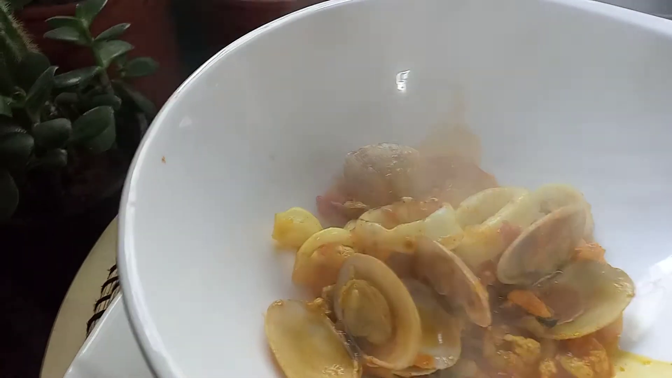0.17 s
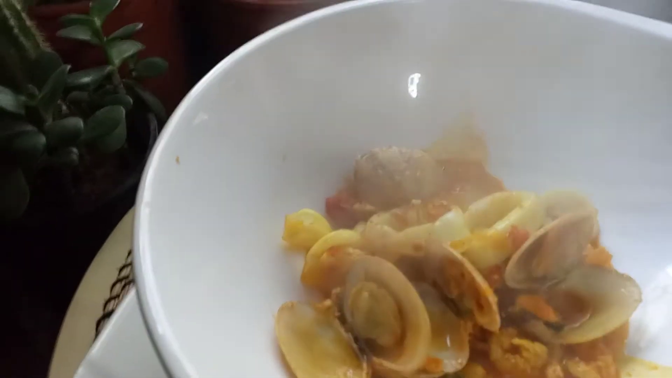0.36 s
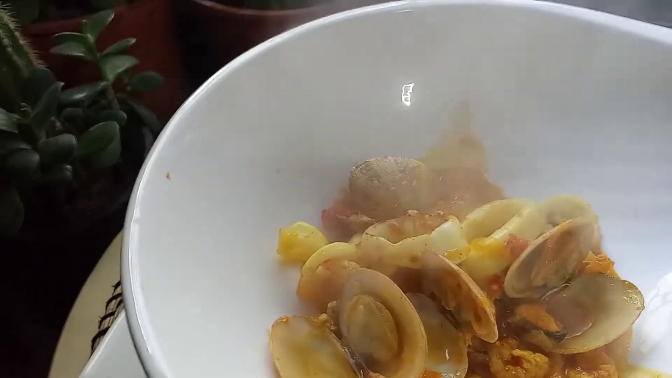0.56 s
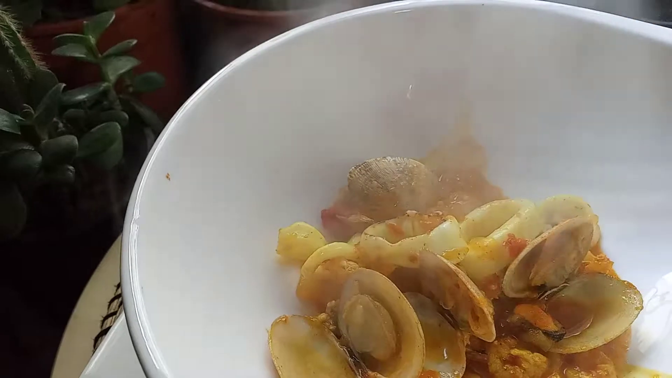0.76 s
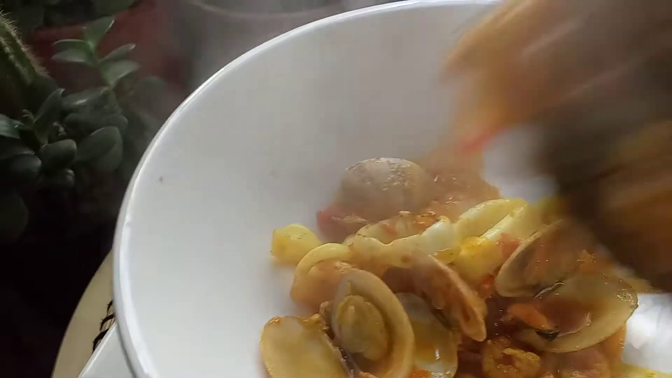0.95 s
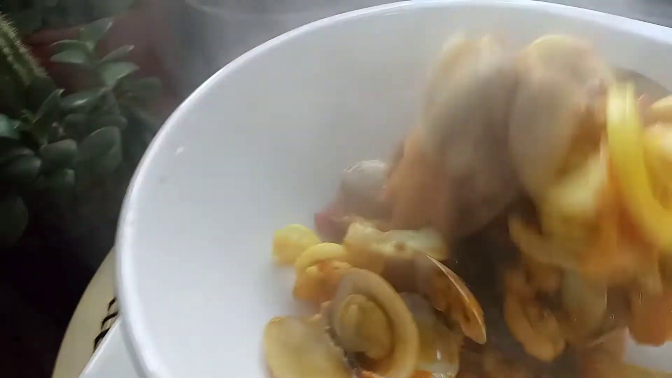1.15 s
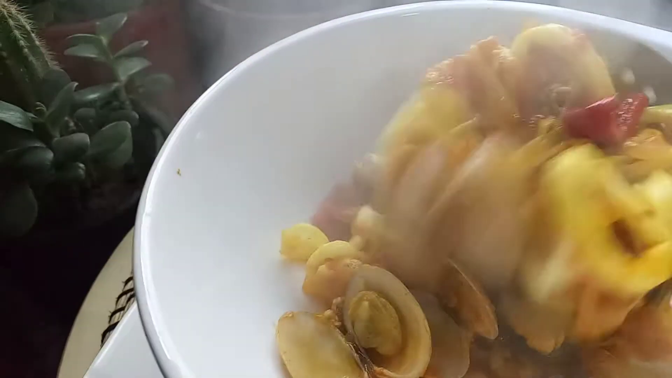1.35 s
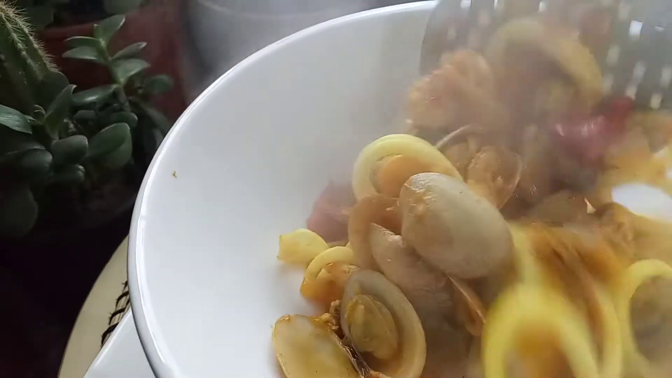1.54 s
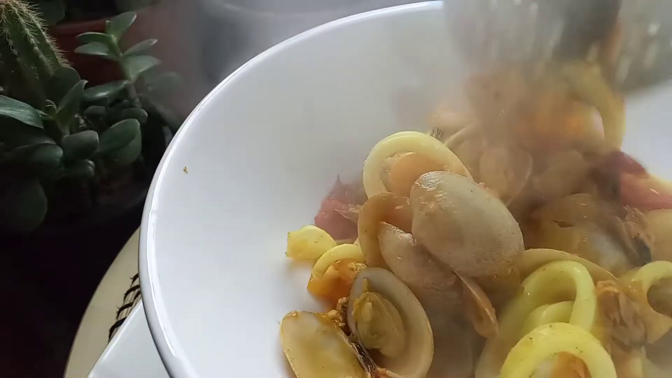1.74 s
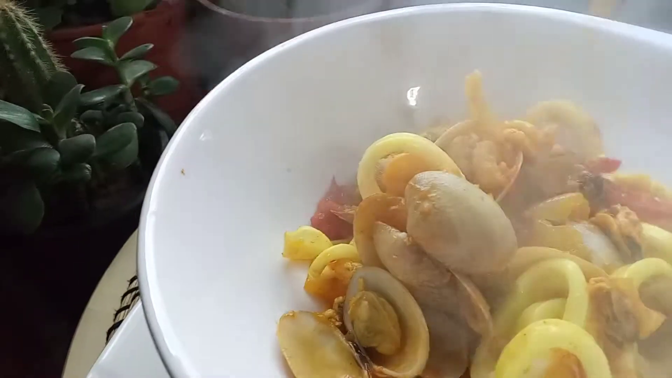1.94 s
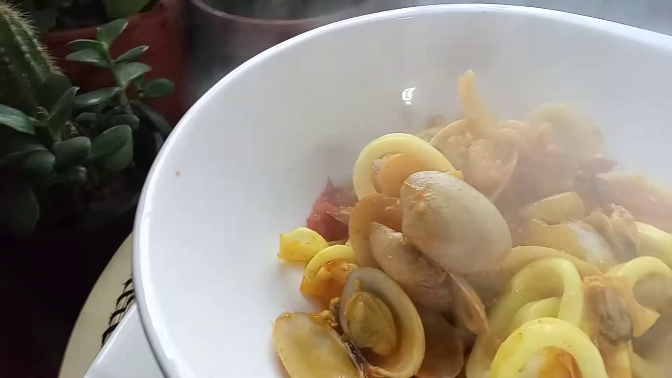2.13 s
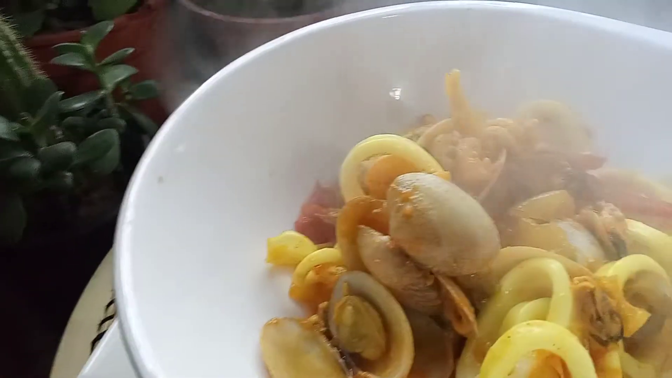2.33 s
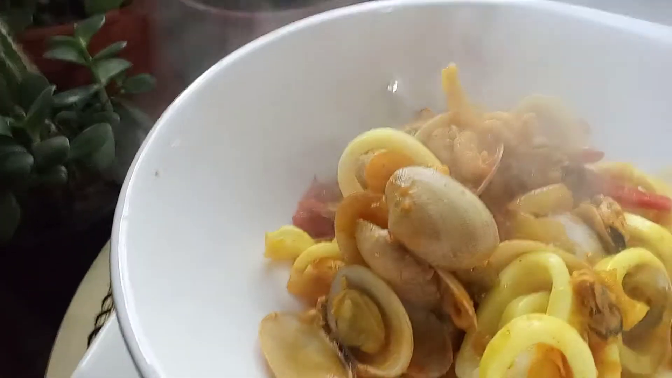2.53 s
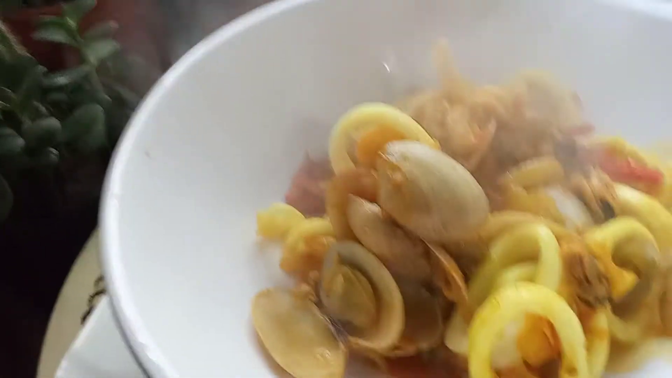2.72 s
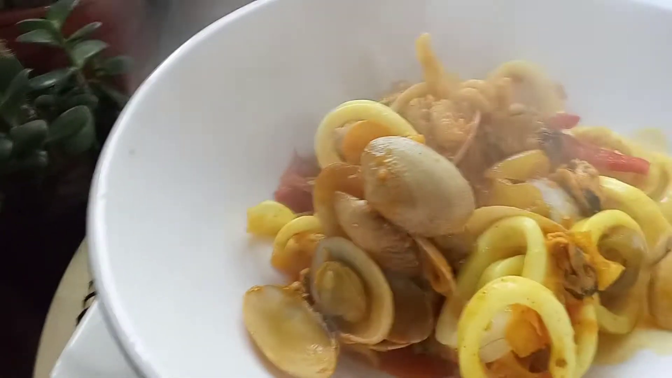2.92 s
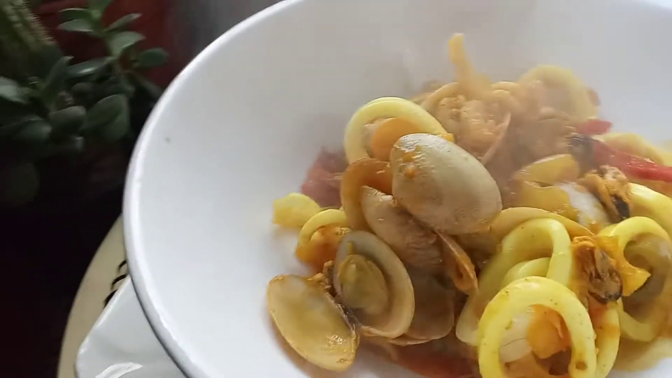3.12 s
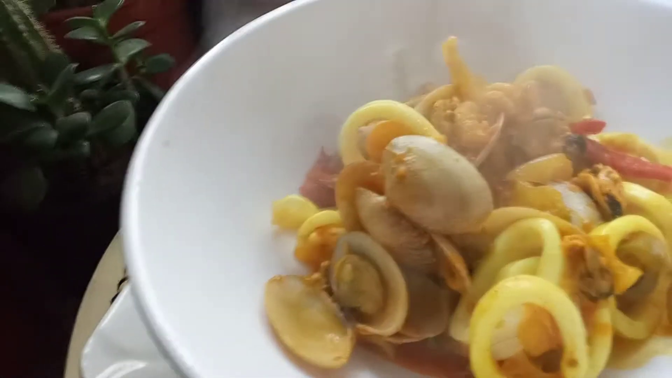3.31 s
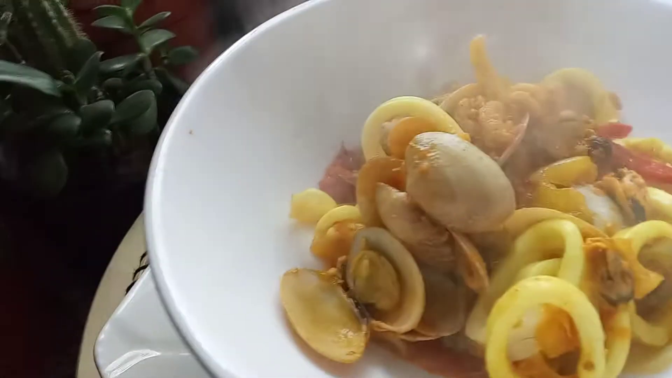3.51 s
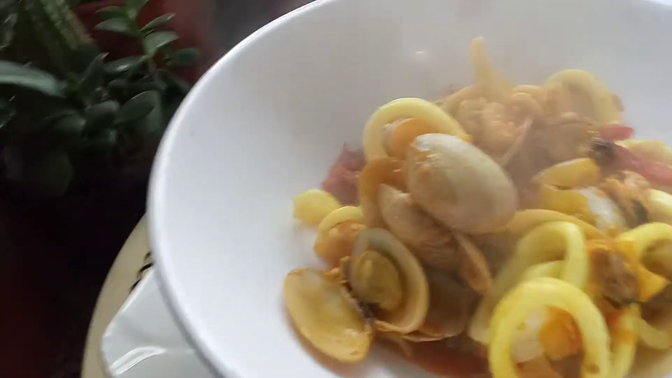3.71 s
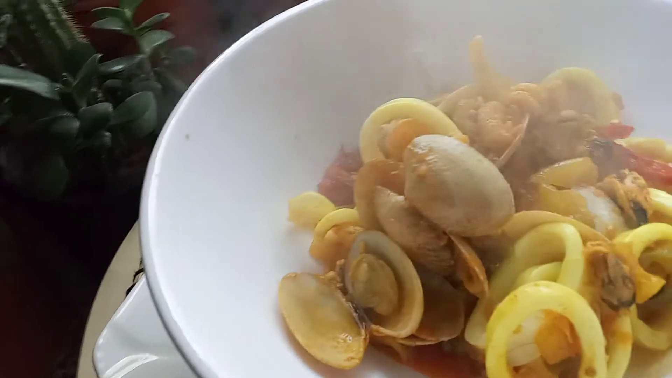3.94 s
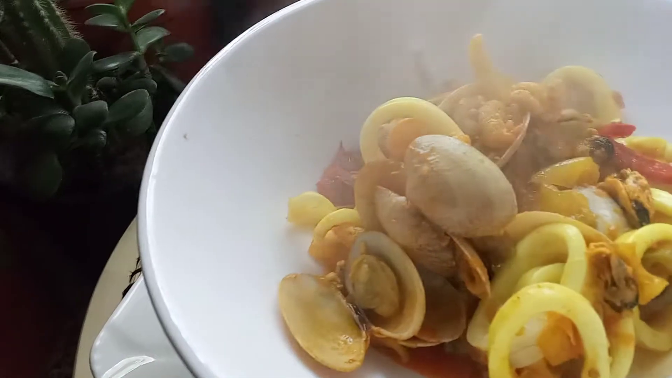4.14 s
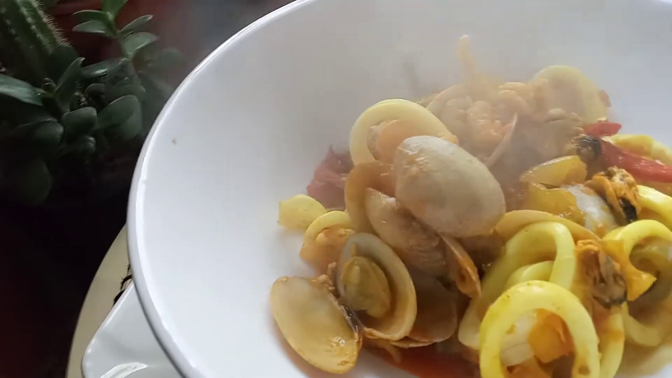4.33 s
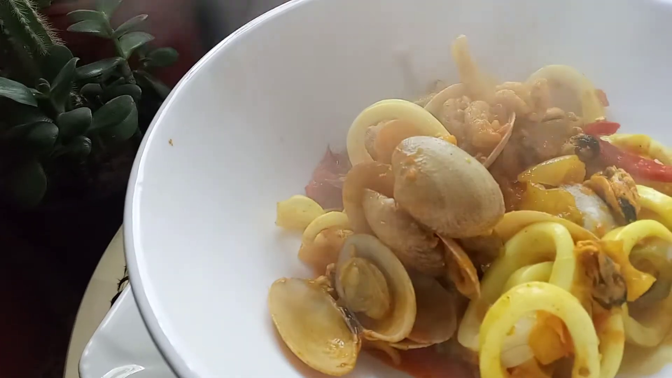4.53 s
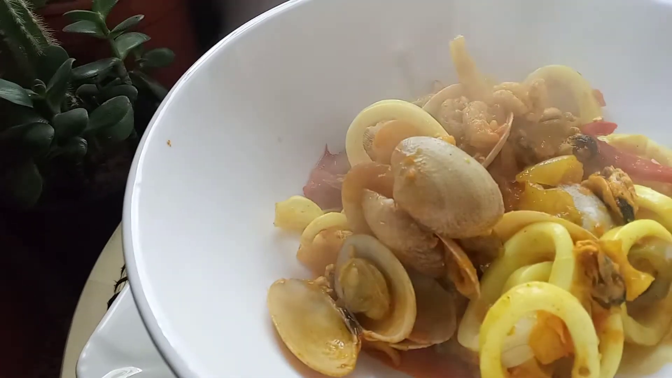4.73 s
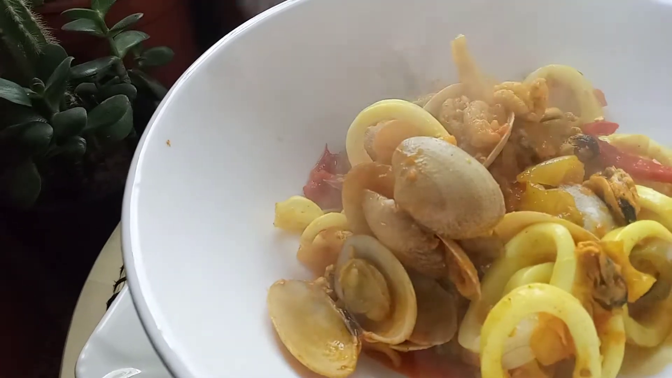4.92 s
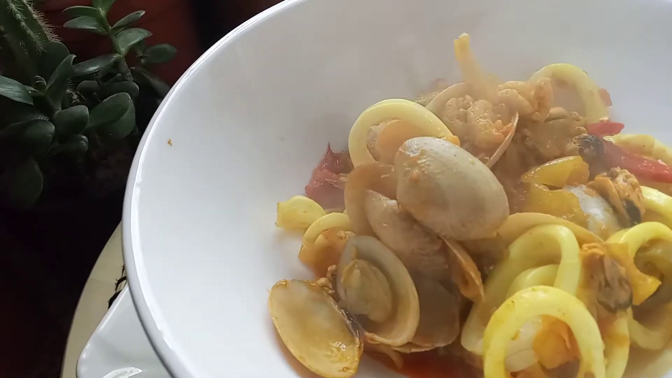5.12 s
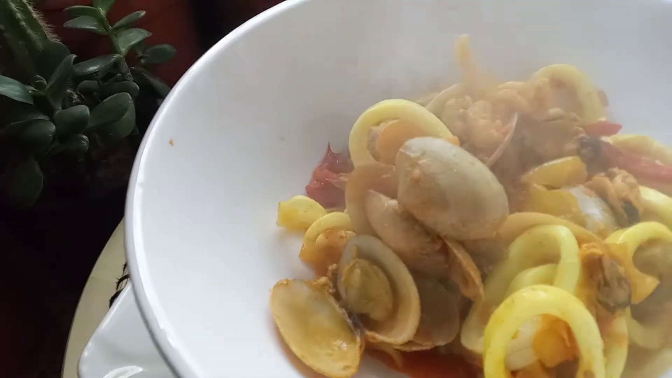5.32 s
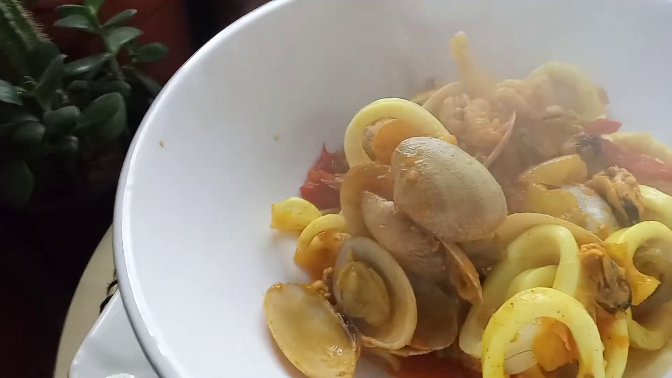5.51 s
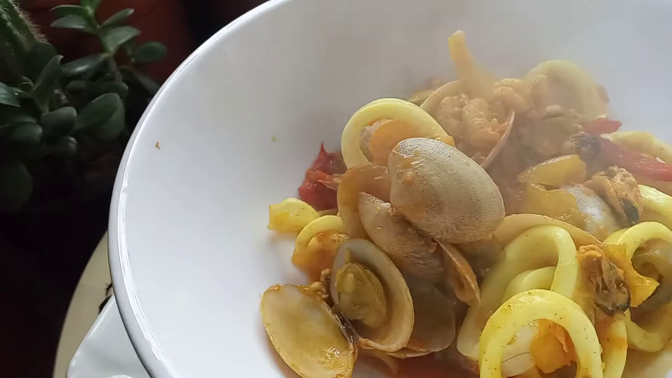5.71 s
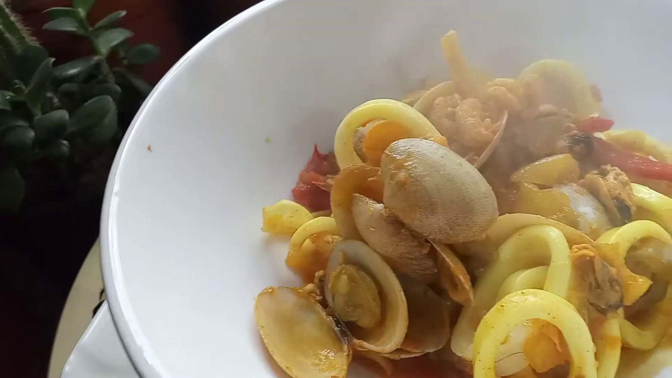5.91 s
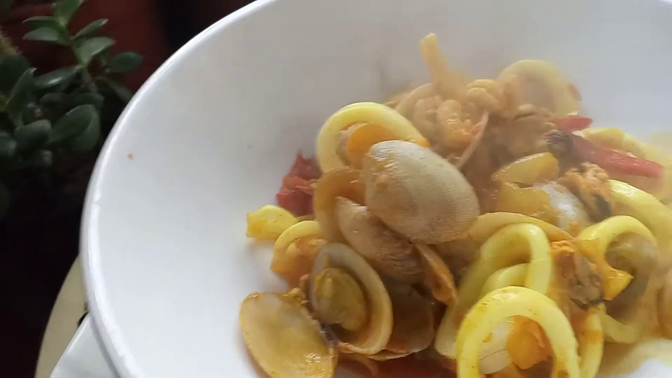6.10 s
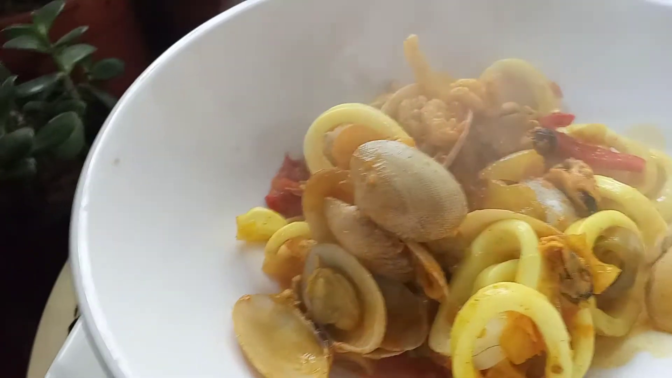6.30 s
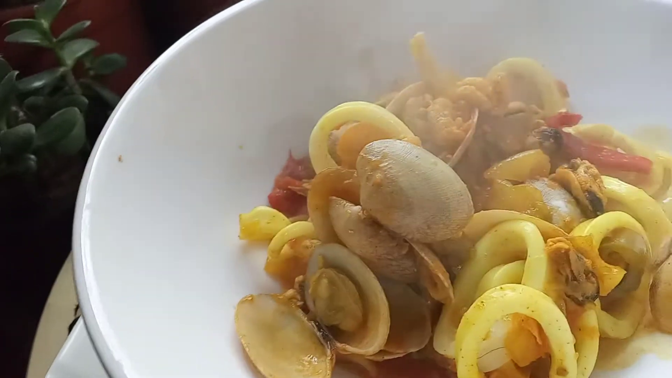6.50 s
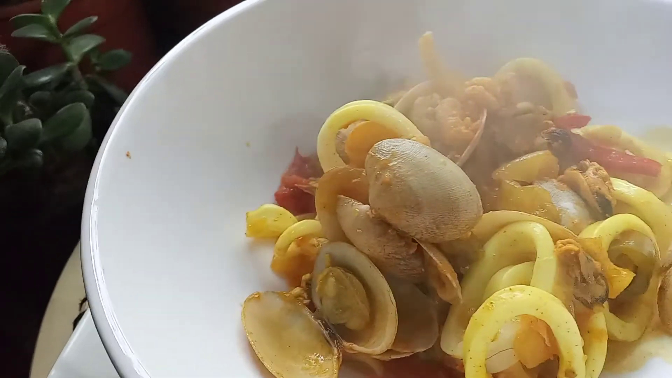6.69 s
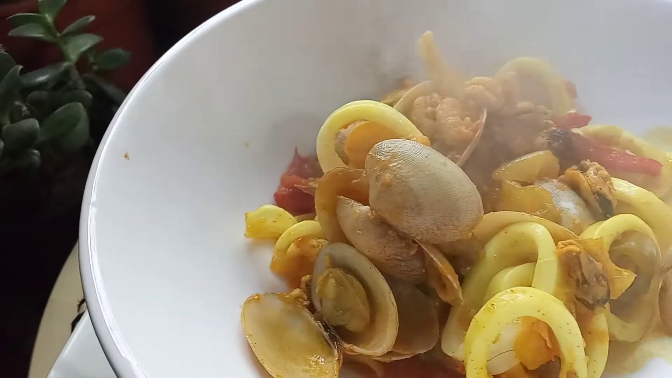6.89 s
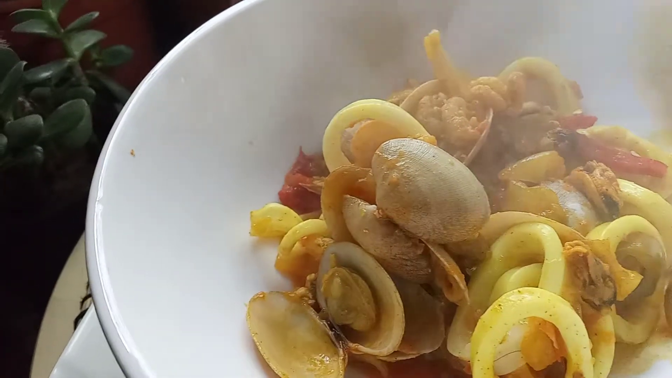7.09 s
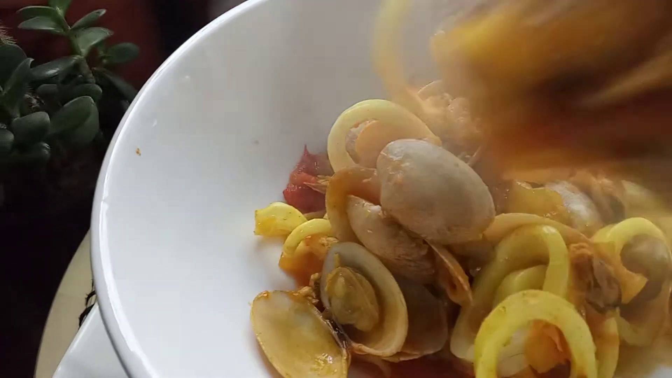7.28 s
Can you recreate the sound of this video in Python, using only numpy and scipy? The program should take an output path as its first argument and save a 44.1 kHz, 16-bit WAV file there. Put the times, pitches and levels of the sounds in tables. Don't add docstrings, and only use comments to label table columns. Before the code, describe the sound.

In a quiet home kitchen with a low fridge hum, cooked shells tick faintly. A spoonful crashes into a ceramic bowl with bright clinks and a short ring. After a pause, the spoon scrapes and rattles shells in a pan to the left, they tumble and settle, a heap falls back with a hard metallic ring, and another serving begins. Close stereo microphone, loud blows ducked.

```python
import sys
import numpy as np
from scipy import signal
from scipy.io import wavfile
from scipy.ndimage import uniform_filter1d

SR = 44100
rng = np.random.default_rng(int(sys.argv[2]) if len(sys.argv) > 2 else 0)


def output_pcm(signal):
    pcm = np.clip(np.atleast_2d(signal).T, -1, 1) * 32767
    wavfile.write(sys.argv[1], SR, np.round(pcm).astype(np.int16))


def invert_db(level):
    return 10 ** (np.asarray(level, dtype=float) / 20)


N = 324135


def evened(x):
    return x / np.sqrt(np.mean(x ** 2, -1, keepdims=True) + 1e-20)


def read_curve(points, hz):
    f, value = np.transpose(points)
    return np.interp(np.log(hz + 1), np.log(f + 1), value)


def add(mix, s, sound):
    part = mix[..., round(s * SR):][..., :sound.shape[-1]]
    part += sound[..., :part.shape[-1]]


def band(x, lo_hz, hi_hz):
    return signal.sosfilt(signal.butter(3, [lo_hz, hi_hz], "band", fs=SR, output="sos"), x)


def fuzzy_tone(hz, width_hz):
    r = np.exp(-np.pi * width_hz / SR)
    slow = signal.lfilter([1], [1, -2 * r, r * r], rng.standard_normal((2, N)))
    carrier = np.exp(2j * np.pi * hz * np.arange(N) / SR)
    return evened(((slow[0] + 1j * slow[1]) * carrier).real)


def ports(pan_db):
    return invert_db(np.array([[.5], [-.5]]) * pan_db) * np.sqrt(2)


def place_db(s):
    at_bowl = .98 < s < 1.75 or s > 7.1
    return 2.5 if at_bowl else 8.5


def patchy(x, patchy_db):
    z = signal.stft(x, nperseg=512)[2]
    patches = rng.standard_normal(z.shape[1:])
    patches = uniform_filter1d(uniform_filter1d(patches, 2, 0), 6, 1)
    return signal.istft(z * invert_db(patchy_db * patches / patches.std()), nperseg=512)[1][:, :N]


# pitch in Hz, level in dB.
SHELL_COLOUR = [(600, -27), (1060, -15.5), (2180, -11.5), (2900, -0.5), (4150, -8), (6500, -3.5),
                (7600, -5), (9400, -18), (11000, -15), (13500, -25), (15200, -9), (16300, -36.5)]


def coloured(x):
    log_gain = np.log(invert_db(read_curve(SHELL_COLOUR, abs(np.fft.fftfreq(4096, 1 / SR)))))
    taps = np.fft.ifft(np.exp(np.conj(signal.hilbert(log_gain)))).real[:1024]
    taps = taps.reshape((1,) * (x.ndim - 1) + (-1,))
    return signal.fftconvolve(x, taps, axes=-1)[..., :x.shape[-1]]


# pitch in Hz, level in dB per Hz.
AIR_COLOUR = [(35, -40), (60, 2), (160, -5), (480, -6), (1300, -22.5), (2070, -13.5), (2900, -20.5),
              (5300, -23), (6200, -13.5), (7600, -10), (9000, -28.5), (11000, -15.5), (13500, -38),
              (15200, -21)]
# pitch in Hz, likeness from -1 to 1.
AIR_LIKENESS = [(40, 0.62), (150, -0.17), (300, -0.35), (640, -0.59), (1400, 0.15), (15000, -0.1)]
# start in seconds, end in seconds, pitch in Hz, level in dB.
STEAM_WHISTLES = [
    (2.13, 2.45, 2643, -74),
    (.75, .99, 5880, -75),
    (6.85, 7.35, 6330, -73),
]


def background():
    frames, hz = N // 512 + 5, np.fft.rfftfreq(2048, 1 / SR)
    a, b, c, d, patches = rng.standard_normal((frames, 1025, 5)).T
    patches = uniform_filter1d(uniform_filter1d(patches, 24, 0), 8, 1)
    same = np.clip(read_curve(AIR_LIKENESS, hz), -1, 1)[:, None]
    left = a + 1j * b
    right = same * left + np.sqrt(1 - same ** 2) * (c + 1j * d)
    shape = invert_db(read_curve(AIR_COLOUR, hz))[:, None]
    z = np.array([left, right]) * shape / np.linalg.norm(shape[hz > 150])
    z *= invert_db(2.6 * patches / patches.std())
    air = signal.istft(z, nperseg=2048, noverlap=1536)[1][:, :N] * invert_db(-58.5 + 3.5)
    t = np.arange(N) / SR
    hum = np.sin(2 * np.pi * 100.0 * t) + 0.17 * fuzzy_tone(100.0, 7.1) + 0.17 * fuzzy_tone(95, 63)
    air += ports(-5.5) * invert_db(-47.5) * hum
    rumble = fuzzy_tone(52, 25) + 0.83 * fuzzy_tone(75, 25)
    air += invert_db(-67.5) * ports(4.0) * rumble * np.interp(t, [2.3, 4.3, 6.1], [.35, .9, .45])
    for start, end, tone_hz, db in STEAM_WHISTLES:
        swell = np.clip(np.minimum(t - start, end - t) / 0.012, 0, 1)
        air += invert_db(db) * fuzzy_tone(tone_hz, 70) * swell * ports(7.5)
    return air


def stroke(s, db, rise, fade):
    t = np.arange(0, N + 32, 32) / SR - s
    return invert_db(2 * (db + np.minimum(rise * t, -fade * t)))


# peak in seconds, level in dB, fade in dB a second, weight in dB (more = deeper sound).
HEAP_CRASHES = [
    (0, -49, 177, -24),
    (.996, -31, 330, 0),
    (1.385, -36, 75.5, -7.5),
    (2.743, -49, 204, 6.5),
    (6.115, -23, 300, -9.5),
]
HEAP_POURS = [
    (1.11, -42, 100, -4.5),
    (1.268, -30.5, 100, 1),
    (1.302, -21.5, 300, -8),
    (6.22, -41, 65, -7),
    (6.3, -39, 132, -8.5),
]
HEAP_SCOOPS = [(2.881, -39.5, 40, 0), (2.991, -37, 39.6, 1.5), (3.08, -33, 61.3, -4),
               (3.134, -34, 223, -0.5), (3.309, -37, 149, -2), (3.4, -38, 80, 3), (3.5, -34.5, 60, -5.5),
               (3.55, -32.5, 59.5, -1.5), (3.594, -21.5, 300, -5), (3.72, -39.5, 131, -1),
               (3.861, -38.5, 68, -0.5), (3.97, -38, 29.8, 0), (4.07, -47, 61, 10.5), (4.23, -36, 41, -0.5),
               (4.31, -38, 70, -21)]
HEAP_SETTLES = [(4.46, -58.5, 60, -3), (4.648, -42.5, 150, -3), (4.705, -36, 55, -11), (4.9, -45, 86.4, -2),
                (5.016, -41.5, 74.5, -7), (5.175, -41.5, 120, -5.5), (5.25, -44, 40, -15),
                (5.291, -37, 200, -0.5), (5.38, -47.5, 52.6, -0.5), (5.453, -41.5, 150, -12.5),
                (5.762, -42.5, 69, -7), (5.973, -37, 133, -6.5)]
# how fast it rises, in dB a second.
SLIDE_RISE = [3160, 450, 356, 1500]
SLIDE_FIZZ = [-17, -13.5, -19.5, -11]
SLIDE_BOOM = [-17, -25, -17.5, -32]
SLIDE_HOLLOW = [-3, -5, -8, -19]
# pitch in Hz, level in dB.
PAN_BODY = [(250, -9.5), (367, -4.5), (470, -6.5), (678, 6)]
# peak in seconds, level in dB, fade in dB a second.
SPOON_BUMPS = [
    (2.75, -50, 148),
    (2.98, -40, 150),
    (3.1, -42.5, 68),
    (3.28, -42.5, 195),
    (3.5, -36, 62),
    (3.595, -39.5, 350),
    (3.7, -47.5, 97),
    (4.08, -50.5, 152),
    (6.125, -43, 48),
]


def slides(true_db):
    grains = invert_db(3.5 * np.minimum(rng.exponential(1, N), 4)) * (rng.random(N) < 300 / SR)
    roughness = signal.lfilter([1], [1, -.985], grains)
    noise = rng.standard_normal((3, N))
    buzz = (1.6 + evened(roughness)) * (noise[0] + 1.53 * noise[1:])
    buzz = patchy(coloured(buzz), patchy_db=3.4)
    boom = sum(invert_db(db) * fuzzy_tone(hz, 50) for hz, db in PAN_BODY)
    boom = boom + 2.0 * evened(band(rng.standard_normal(N), 236, 950))
    limits_hz = [(4540, 7500), (2227, 4910), (1120, 2334), (600, 1120), (9400, 15000)]
    buzzes = [band(buzz, lo, hi) for lo, hi in limits_hz] + [np.array([boom, boom])]
    side_share = [1.0, 1.0, 0.69, 0.4, 0.1, .1]
    power = 0
    for k, rows in enumerate([HEAP_CRASHES, HEAP_POURS, HEAP_SCOOPS, HEAP_SETTLES]):
        for s, db, fade, weight_db in rows:
            parts_db = np.array([-4 - 0.24 * weight_db,
                                 1.5 + 0.49 * weight_db,
                                 weight_db - 0.7,
                                 weight_db + SLIDE_HOLLOW[k],
                                 SLIDE_FIZZ[k] - 0.3 * weight_db,
                                 SLIDE_BOOM[k]])
            sides = np.array([ports(share * 0.71 * place_db(s)) for share in side_share])
            gains = invert_db(parts_db)[:, None, None] * sides
            power = power + gains ** 2 * stroke(s, db, SLIDE_RISE[k], fade)
    power[-1] += sum(2 * stroke(s, db, 700, fade) for s, db, fade in SPOON_BUMPS)
    level = np.repeat(np.sqrt(power), repeats=32, axis=2)
    level = uniform_filter1d(level, size=32, axis=2)[..., :N]
    made_up_db = np.where(np.gradient(true_db) < 0, true_db, np.minimum(true_db, 7))
    return (level * evened(np.array(buzzes))).sum(0) * invert_db(made_up_db - 2.5)


# time in seconds, peak in dB, ring pitch in Hz, level of the body in dB.
COOLING_TICKS = [(.0995, -31.5, 6140, -14), (.1727, -34.5, 7360, -38), (.2065, -28, 6600, -24),
                 (.221, -30.5, 2340, -13.5), (.2832, -22, 7260, -42), (.423, -31.5, 6300, -38),
                 (.4536, -31, 7040, -15.5), (.481, -36.5, 4010, -10.5), (.5374, -36.5, 7660, -21),
                 (2.3913, -38, 6560, -18), (2.518, -41.5, 6500, -15), (6.4457, -35, 4900, -23),
                 (6.562, -42, 7500, -32), (6.5854, -27.5, 6150, -42), (6.6695, -32, 6500, -36),
                 (6.7214, -24.5, 3690, -41), (6.7387, -21, 7350, -33), (6.766, -35.5, 1060, -30),
                 (7.1162, -40.5, 5800, -30)]
SHELL_DROPS = [(0.9909, -4.5, 3700, -13), (1.0165, -14.5, 3540, -17), (1.082, -31, 1500, 2.5),
               (1.1956, -31.5, 1290, -6), (1.234, -31, 1400, -14), (1.261, -17, 2520, -8),
               (1.2882, -10.5, 6700, -16), (1.3206, -18, 5530, -6.5), (1.381, -2.5, 5480, -32),
               (1.5229, -11, 4720, -14.5), (6.11, -3, 3026, -12.5), (6.1686, -6.5, 7620, -16.5),
               (6.1966, -16, 2410, -23), (6.233, -12, 3080, -13), (6.2956, -20, 7420, -11),
               (7.3463, -6.5, 2920, -24)]
SPOON_PUSHES = [(2.7094, -39.5, 1990, -12), (2.7406, -19.5, 6230, -8.5), (2.862, -11.5, 3850, -12),
                (2.9104, -20, 3390, -7), (2.9339, -10.5, 2860, -18), (3.0897, -24, 1890, -8),
                (3.327, -25.5, 2570, -8), (3.3845, -21.5, 1890, -19), (3.48, -10, 3430, -13),
                (3.5337, -15.5, 4000, -18), (3.5864, -11.5, 2860, -12.5), (3.6406, -12, 4380, -13.5),
                (3.865, -23, 2240, -12), (4.072, -17, 4820, -6.5), (4.217, -11, 2520, -19),
                (4.259, -12.5, 6730, -15.5), (4.3, -20.5, 5330, -13), (4.398, -27, 1810, -22),
                (4.4448, -18.5, 3160, -14)]
WET_TUMBLES = [(4.515, -26, 7150, -35), (4.595, -24.5, 6770, -13), (4.6454, -24, 1112, -13),
               (4.6999, -12, 5460, -13.5), (4.7074, -9, 2936, -13.5), (4.853, -26, 6350, -22),
               (4.909, -27.5, 6530, -16), (5.011, -9, 3234, -18), (5.0974, -26.5, 1820, -11),
               (5.1699, -24, 6450, -11), (5.2714, -28, 6200, -16), (5.2926, -20.5, 6640, -10.5),
               (5.3194, -19.5, 1900, -11), (5.397, -26.5, 7450, -30), (5.448, -25, 1616, -8),
               (5.7057, -24, 3160, -47), (5.7196, -25, 4470, -8), (5.7587, -10.5, 6460, -6),
               (5.9297, -27, 6780, -15.5), (5.9738, -21.5, 6750, -11), (5.9897, -21, 3290, -22)]
# time in seconds, peak in dB, ring pitch in Hz.
SAUCE_CRACKLES = [(0.1205, -33.5, 7600), (0.1832, -33, 7000), (0.3063, -34, 7700), (0.4394, -37, 7300),
                  (0.4988, -43, 6600), (1.624, -38, 5780), (1.664, -33.5, 7400), (3.279, -45.5, 6900),
                  (3.9419, -26, 4300), (4.1634, -28, 4930), (4.5555, -34, 6700), (4.5763, -27, 6800),
                  (4.61, -28, 6300), (4.9352, -29.5, 6300), (5.0345, -31, 6700), (5.249, -29.5, 6450),
                  (5.3038, -19, 6960), (5.488, -28.5, 6900), (5.574, -35, 6520), (5.5945, -35.5, 6170),
                  (5.665, -33, 4400), (5.6898, -30, 6840), (5.8396, -29.5, 6870), (6.017, -21.5, 6500),
                  (6.0396, -26.5, 6620), (6.6894, -37, 6450), (6.8224, -37, 7260)]
SAUCE_SPRAY = [-15, -20.5, -28, -20.5, -16]


def knocks_and_rings(true_db):
    crackles = [(*row, -34.5) for row in SAUCE_CRACKLES]
    kinds = [COOLING_TICKS, SHELL_DROPS, SPOON_PUSHES, WET_TUMBLES, crackles]
    rows = [row for kind in kinds for row in kind]
    spray_db = np.repeat(SAUCE_SPRAY, [len(kind) for kind in kinds])
    t, out = np.arange(1200) / SR, np.zeros((2, 2, N))
    chance = rng.standard_normal((len(rows), 3, len(t)))
    shared = chance[:, :1] ** 2 * np.sign(chance[:, :1])
    t60 = np.interp([row[1] for row in rows], [-35, -8], [.015, .03])[:, None, None]
    chatter = coloured((shared + 2.3 * chance[:, 1:]) * invert_db(-60 * t / t60))
    edges_hz = [800, 2500, 5000, 9000, 17000]
    parts = [band(chatter, lo, hi) for lo, hi in zip(edges_hz, edges_hz[1:])]
    dull, middle, bright, fizz = (p / abs(p).max((1, 2), keepdims=True) for p in parts)
    for k, (s, db, hz, body_db) in enumerate(rows):
        pan_db = place_db(s) + 3.6 * chance[k, 0, 1]
        side_hz = hz * np.exp(0.2944 * chance[k, :, :1])
        ring = np.sin(2 * np.pi * hz * t) + 0.28 * np.sin(2 * np.pi * side_hz * t).sum(0)
        ring *= invert_db(-60 * t / (45 / hz + .010)) * np.minimum(t / .0003, 1)
        top = np.interp(hz, [1500, 5000], [.15, .75]) * bright[k] + invert_db(body_db + 7) * middle[k]
        low = invert_db(1.43 * body_db - 6.5 + 7.5) * dull[k]
        spray = invert_db(spray_db[k] - 0.26 * (db + 18) + 9) * fizz[k]
        spray = spray * np.interp(hz, [1000, 3000], [.3, 1.01])
        knock = ports(pan_db) * top + ports(0.53 * pan_db) * low + ports(0.13 * pan_db) * spray
        strength = invert_db(db + true_db[round(s * SR)] - 0.5)
        add(out, s, strength * np.array([knock, 0.36 * ports(pan_db) * ring]))
    return out


# pitch in Hz, seconds to fade by 60 dB.
ROOM_FADE = [(300, 0.2), (1700, 0.48), (4600, 0.38), (12000, 0.21)]


def kitchen(x):
    taps = np.zeros((2, SR // 2))
    at = np.arange(260, SR // 2 - 20, 20) + rng.integers(0, 20, (2, (SR // 2 - 261) // 20))
    np.put_along_axis(taps, at, rng.choice([-1., 1.], at.shape), 1)
    hz, t, z = signal.stft(taps, SR, nperseg=256)
    fading = z * invert_db(-60 * t / read_curve(ROOM_FADE, hz)[:, None])
    tail = signal.istft(fading, SR, nperseg=256)[1]
    return signal.oaconvolve(x, tail / np.linalg.norm(tail[0]), axes=1)[:, :N]


# time in seconds, excess in dB, recovery in dB a second.
LOUD_BLOWS = [(.991, 12, 332), (1.289, 6, 152), (1.379, 15, 304), (1.419, 13.5, 400), (2.74, 1, 150),
              (3.487, 17, 519), (3.574, 6, 150), (3.611, 2, 300), (3.639, 8, 411), (4.076, 0, 103),
              (4.701, 11.5, 360), (4.732, 12.5, 500), (5.756, 0, 300), (6.107, 25, 194), (6.167, 20, 294),
              (6.232, 10, 201), (7.346, 2, 301)]


def limiter_db():
    t, drop = np.arange(N) / SR, np.zeros(N)
    for s, excess_db, recovery in LOUD_BLOWS:
        ahead = excess_db * (1 + (t - s) / 0.017)
        after = excess_db - recovery * (t - s)
        drop = np.maximum(drop, np.minimum(ahead, after))
    return -uniform_filter1d(drop, 200)


# start in seconds, length in
# seconds, pitch in Hz, level in dB.
SHELL_NOTES = [(1.016, .04, 3540, -28), (1.235, .03, 1340, -36), (1.25, .08, 2300, -27),
               (1.26, .05, 2650, -26), (1.27, .05, 1100, -36), (1.3, .04, 700, -38),
               (2.862, .03, 3850, -32), (2.934, .02, 2800, -32), (2.98, .025, 650, -40),
               (2.996, .015, 1420, -38), (3.034, .03, 3480, -36), (3.13, .02, 3100, -33),
               (3.14, .02, 1500, -38), (3.296, .02, 1530, -41), (3.372, .05, 1850, -32),
               (3.42, .04, 2600, -39), (3.48, .06, 3210, -28), (3.52, .025, 370, -36),
               (3.565, .06, 2850, -21), (3.57, .04, 3700, -23), (3.585, .03, 700, -34),
               (3.642, .02, 4900, -28), (3.868, .02, 2120, -36), (3.9, .05, 1550, -37),
               (3.95, .015, 2400, -36), (4.0, .06, 1350, -37), (4.0, .05, 3450, -37),
               (4.06, .02, 1500, -38), (4.128, .03, 1450, -36), (4.2, .012, 2820, -32),
               (4.218, .05, 2350, -29), (4.22, .04, 2850, -31), (4.28, .02, 2360, -34),
               (4.304, .015, 1900, -37), (4.33, .04, 4200, -37), (4.35, .04, 3000, -38),
               (4.415, .015, 3250, -33), (4.445, .04, 2400, -37), (4.491, .015, 2600, -39),
                   (4.524, .012, 1580, -38), (4.5845, .01, 3220, -40), (4.611, .012, 3320, -34),
                   (4.65, .04, 1050, -36), (4.71, .04, 2030, -31), (4.72, .1, 2950, -33),
                   (4.74, .07, 3750, -33), (4.867, .01, 4150, -39), (4.894, .012, 1890, -38),
                   (4.91, .03, 1450, -41), (4.976, .006, 2620, -35), (5.052, .03, 3240, -39),
                   (5.12, .03, 1050, -42), (5.136, .012, 3220, -40), (5.194, .012, 2620, -39),
                   (5.2326, .008, 1700, -36), (5.2934, .012, 1550, -30), (5.35, .015, 1500, -40),
                   (5.422, .012, 1390, -40), (5.45, .05, 3200, -39), (5.48, .015, 2580, -39),
                   (5.555, .03, 3220, -46), (5.7055, .012, 3100, -29), (5.718, .01, 4500, -27),
                   (5.718, .01, 1850, -30), (5.758, .015, 1780, -28), (5.78, .14, 1700, -44),
                   (5.929, .012, 2520, -43), (5.96, .03, 1510, -37), (5.99, .04, 3210, -38)]


def singing_shells(true_db):
    rows, out = SHELL_NOTES, np.zeros((2, N))
    partial_gain = np.array([[.4], [.7], [1], [.7], [.4]])
    for (s, length, hz, db), chance in zip(rows, rng.uniform(-1, 1, (len(rows), 11))):
        t = np.arange(0, 2 * length, 1 / SR)
        spread = np.linspace(-1, 1, num=5) + .2 * chance[:5]
        partials = hz * (1 + .045 * spread)[:, None]
        phase = np.pi * chance[5:10, None]
        tone = (partial_gain * np.sin(2 * np.pi * partials * t + phase)).sum(0)
        shape = np.minimum(t / .0015, 1) * invert_db(db - 8 - 16 * (t / length) ** 2)
        add(out, s, ports(.8 * place_db(s) + 2 * chance[10]) * tone * shape)
    return out * invert_db(true_db)


def struck(modes, blows, pan_db):
    t, out = np.arange(SR)[:, None] / SR, np.zeros((2, N))
    hz, db, t60 = np.transpose(modes)
    turn = .5 * rng.standard_normal((2, 1, len(hz)))
    for s, blow_db in blows:
        spot_db = rng.standard_normal(len(hz))
        fade = invert_db(blow_db + db + spot_db - 60 * t / t60 - 38 * t ** 2)
        build_up = np.minimum(t * hz / 18 + .2, 1)
        ring = fade * build_up * np.sin(2 * np.pi * hz * (t + round(s * SR) / SR) + turn)
        add(out, s, ports(pan_db) * ring.sum(2) * np.minimum(t[:, 0] / 0.00093, 1))
    return out


# pitch in Hz, level in dB, seconds to fade by 60 dB.
BOWL_TONES = [(1125, -14, .25), (1195, -14, .6), (1981, -9, .55), (3139, -1, .45), (4152, -11, .35),
              (4392, -6, .35), (5440, -5, .3), (5784, -4, .3), (5932, -12, .3), (6315, -17, .25),
              (7120, -14, .35), (7725, -17, .25), (7480, -16, .3), (8861, -19, .15)]
# time in seconds, level in dB.
BOWL_HITS = [
    (1.325, -41),
    (1.381, -25.5),
    (1.418, -31),
]


def bowl_rings():
    return struck(BOWL_TONES, BOWL_HITS, 3.2)


# pitch in Hz, level in dB, seconds to fade by 60 dB.
PAN_TONES = [(1093, -18, .6), (2353, -4, .6), (2772, -1, .4), (2836, -5, .4), (2961, -2, .5),
             (3499, -3, .45), (4285, -11, .4), (4850, -10, .5), (5895, -10, .4), (6611, -12, .4),
             (7262, -9, .35), (7628, -12, .4)]
# time in seconds, level in dB.
PAN_HITS = [
    (4.707, -40),
    (6.112, -26),
    (6.168, -44.5),
    (6.232, -49),
]
# start in seconds, pitch in Hz, level in dB, seconds to fade by 60 dB.
PAN_FLOOR = [
    (6.13, 232, -46.5, 0.47),
]


def pan_rings():
    floor = sum(struck([(hz, db, t60)], [(s, 0)], 3.4) for s, hz, db, t60 in PAN_FLOOR)
    return struck(PAN_TONES, PAN_HITS, 4.2) + floor


def scene():
    true_db = -limiter_db()
    knocks, shell_rings = knocks_and_rings(true_db)
    heap = slides(true_db)
    shell_rings = shell_rings + singing_shells(true_db)
    near = knocks + shell_rings + heap
    near[1] = np.roll(near[1], -22)
    ringing = patchy(bowl_rings() + pan_rings(), patchy_db=2.4)
    near += ringing * invert_db(.85 * true_db)
    echoes = kitchen((knocks + 0.5 * shell_rings) * invert_db(-.2 * true_db))
    return near + invert_db(-11.5) * echoes + background()


def roll_off(x):
    return signal.sosfilt(signal.butter(12, 16300, fs=SR, output="sos"), x)


def record(dry):
    edges = signal.ellip(6, .5, 40, [30, 16000], "band", fs=SR, output="sos")
    ducked = signal.sosfilt(edges, dry) * invert_db(limiter_db())
    mix = 0.89 * np.tanh(ducked / 0.92)
    return roll_off(mix)


dry = scene()
out = record(dry)
output_pcm(out)
```